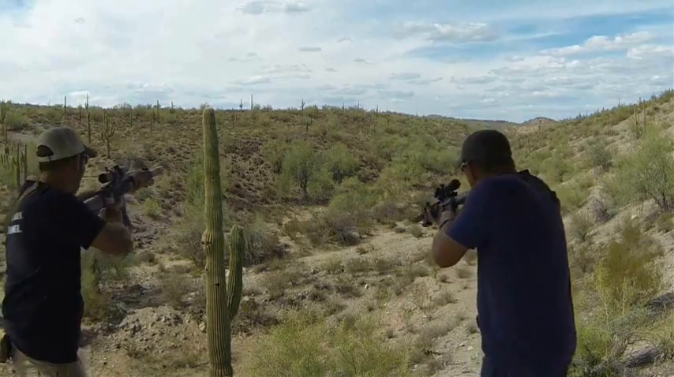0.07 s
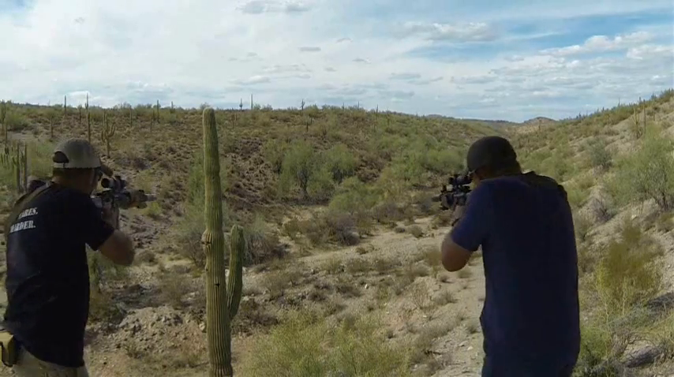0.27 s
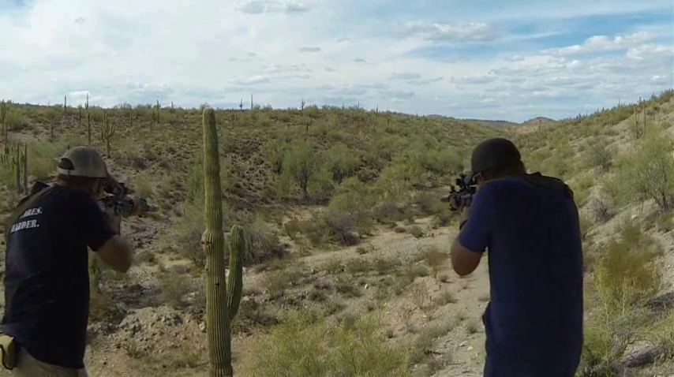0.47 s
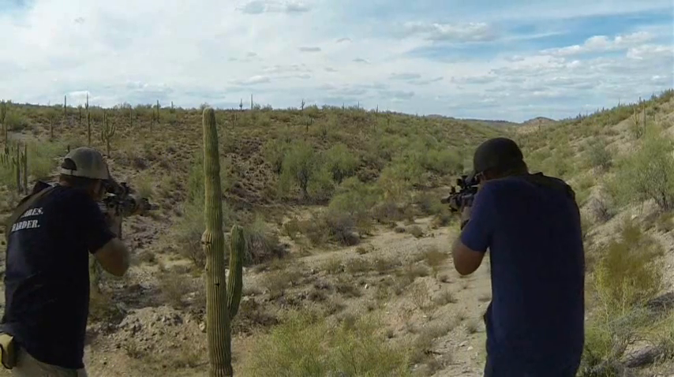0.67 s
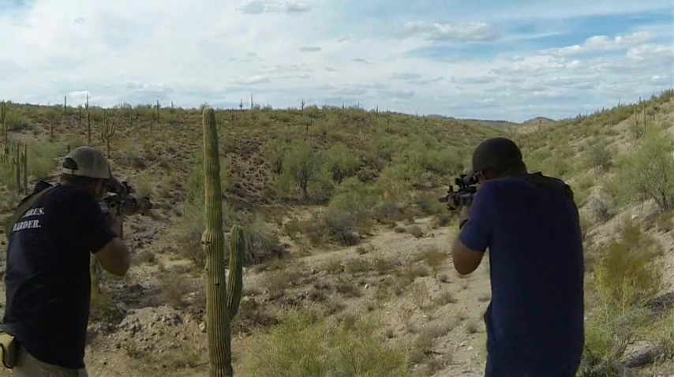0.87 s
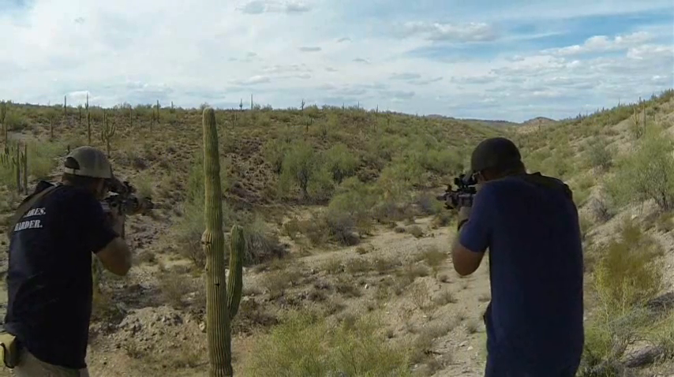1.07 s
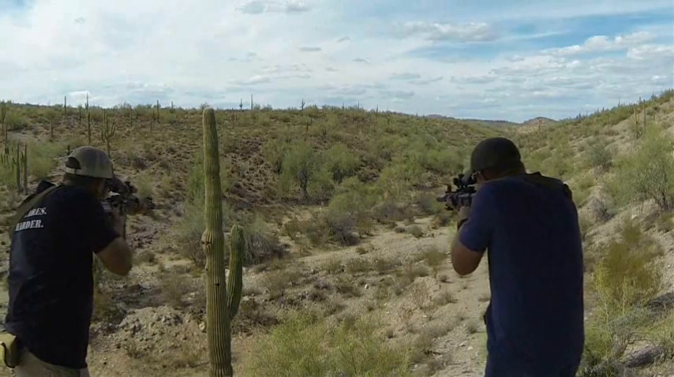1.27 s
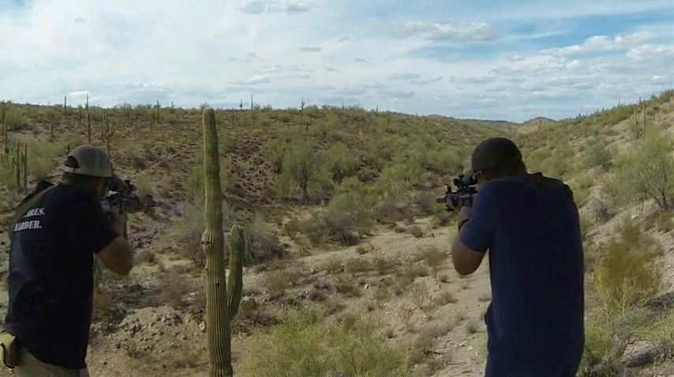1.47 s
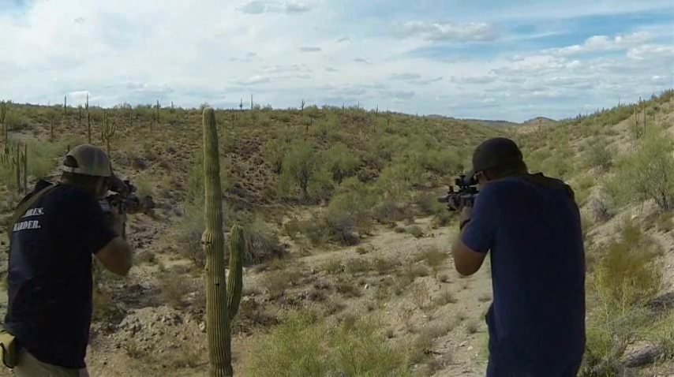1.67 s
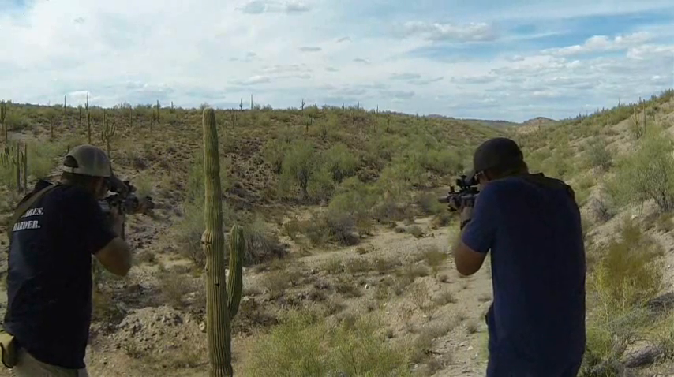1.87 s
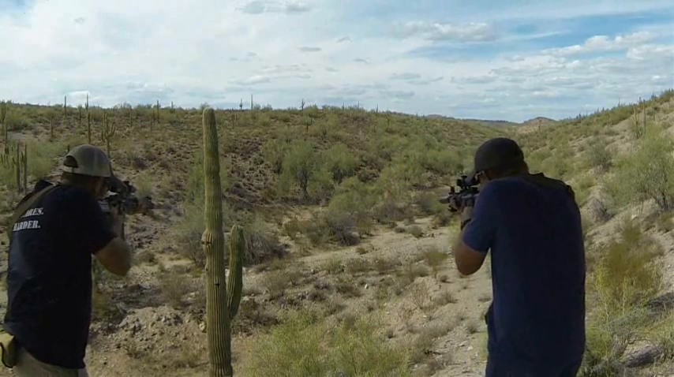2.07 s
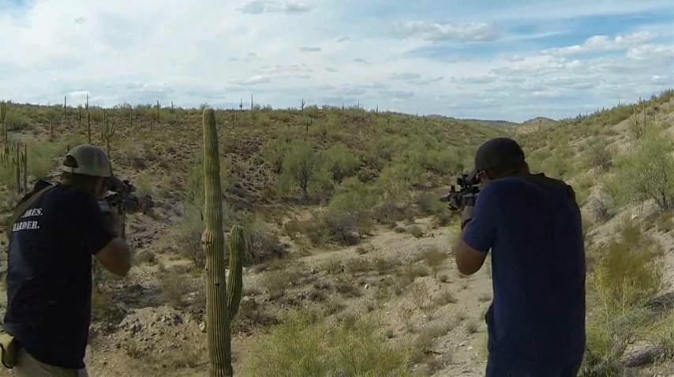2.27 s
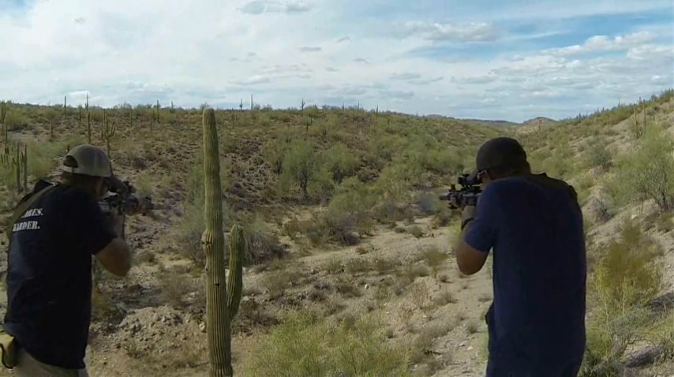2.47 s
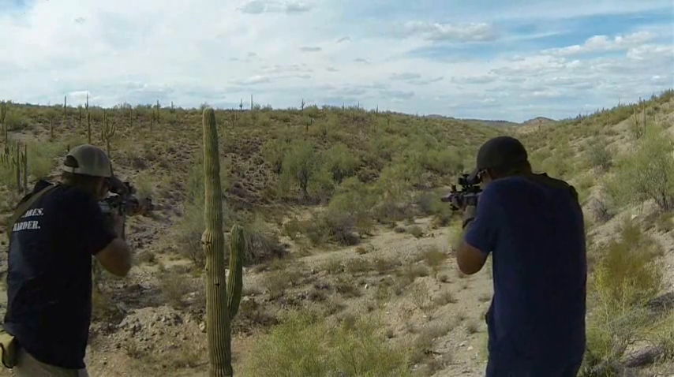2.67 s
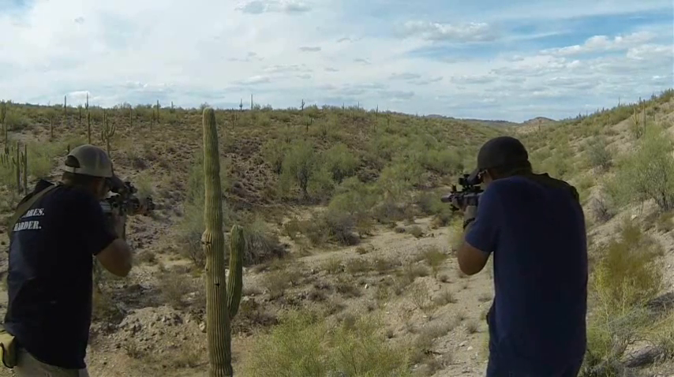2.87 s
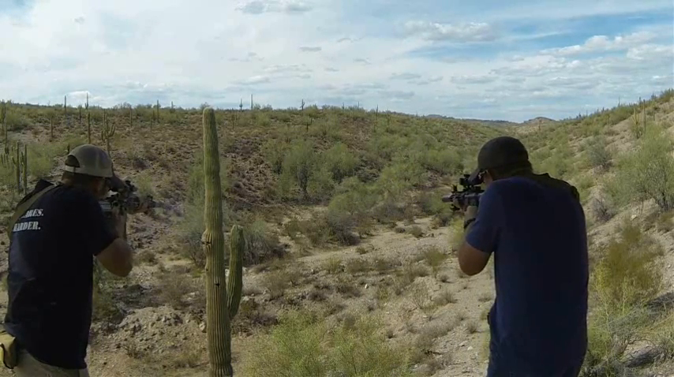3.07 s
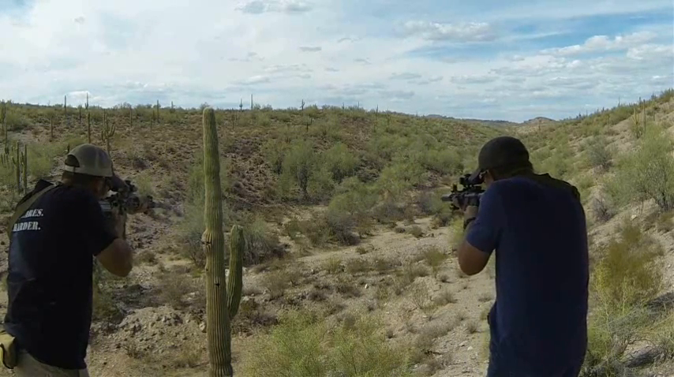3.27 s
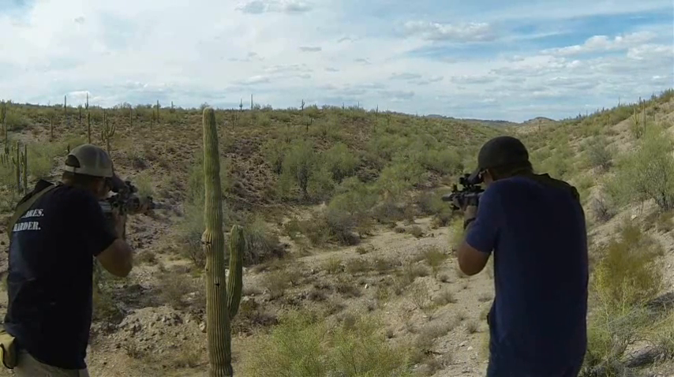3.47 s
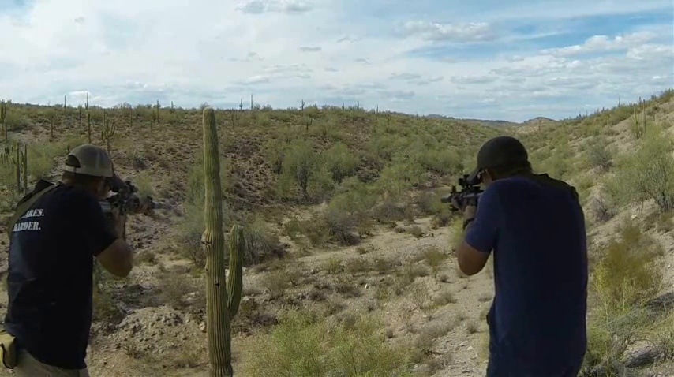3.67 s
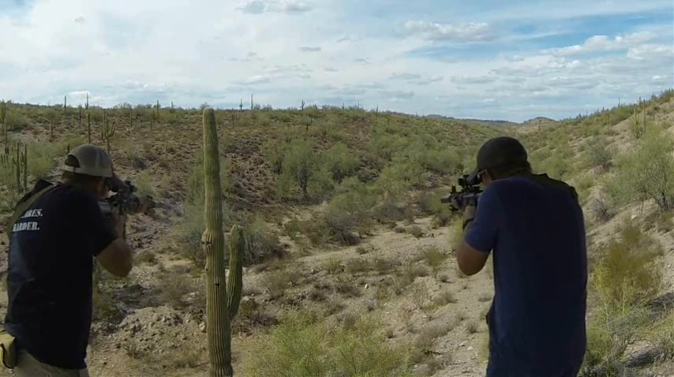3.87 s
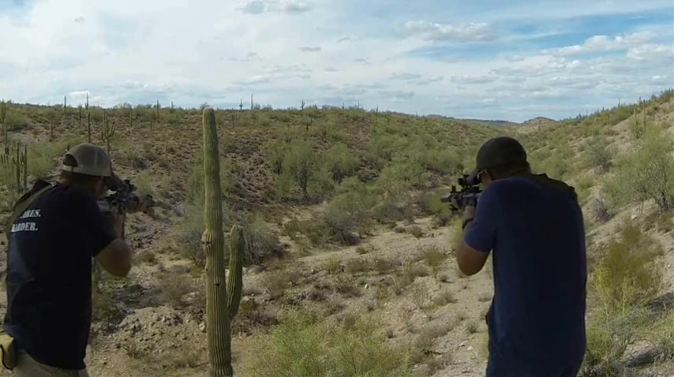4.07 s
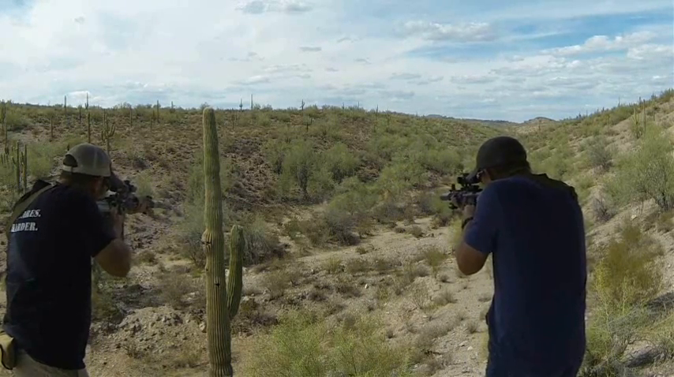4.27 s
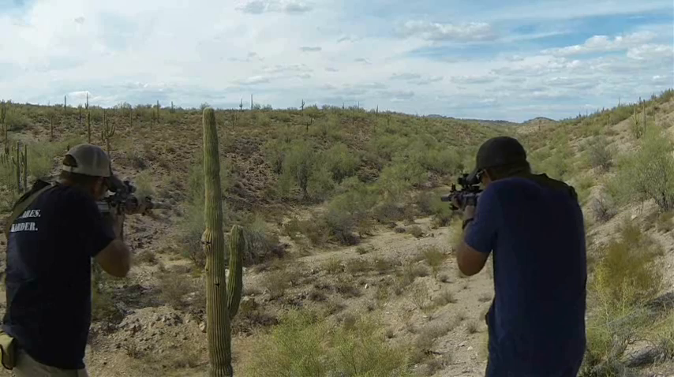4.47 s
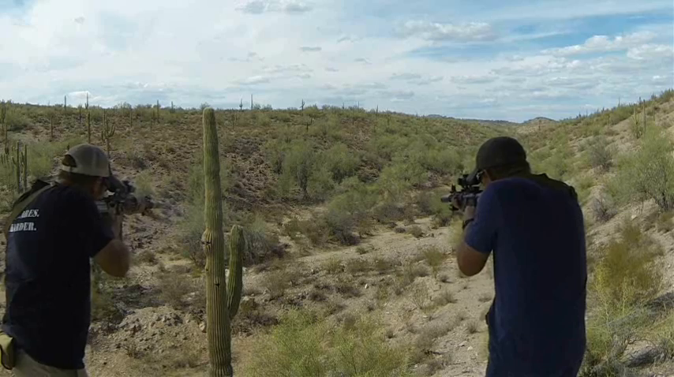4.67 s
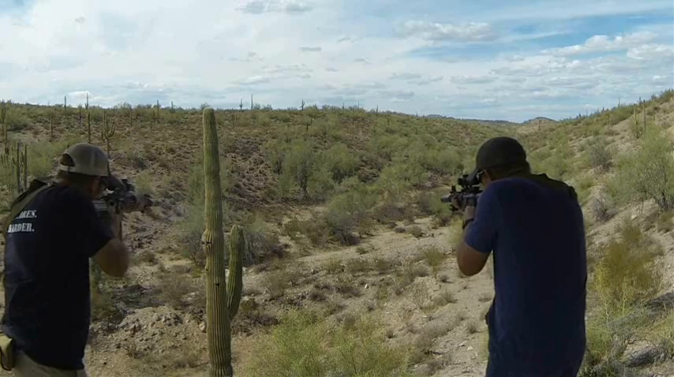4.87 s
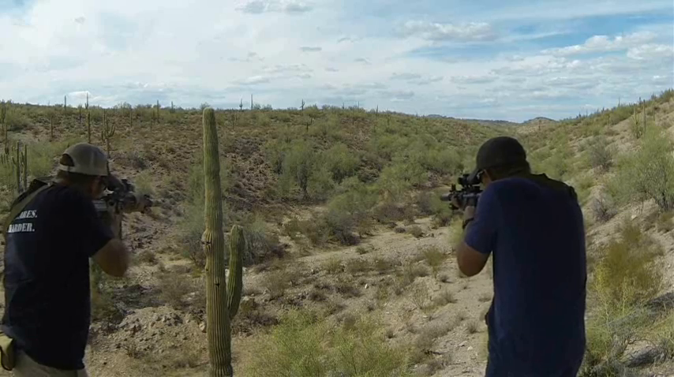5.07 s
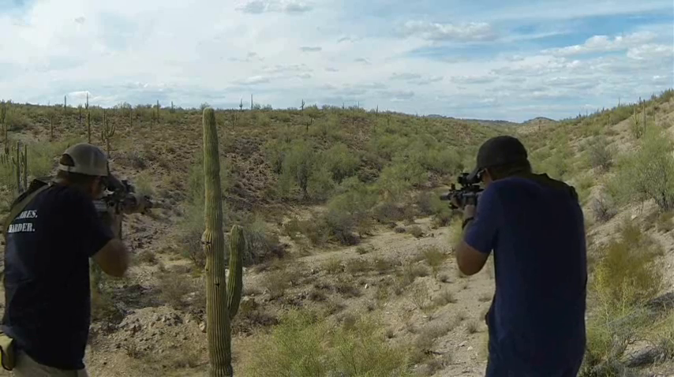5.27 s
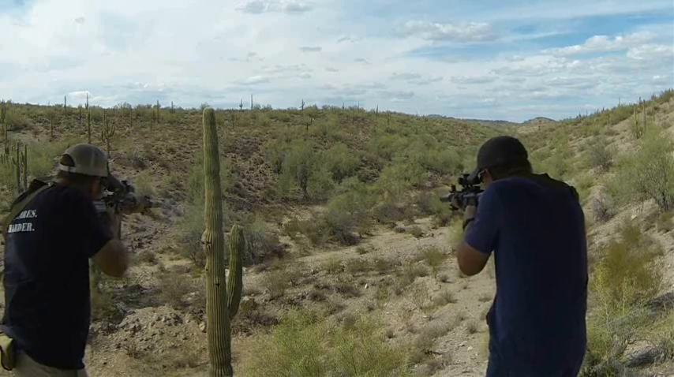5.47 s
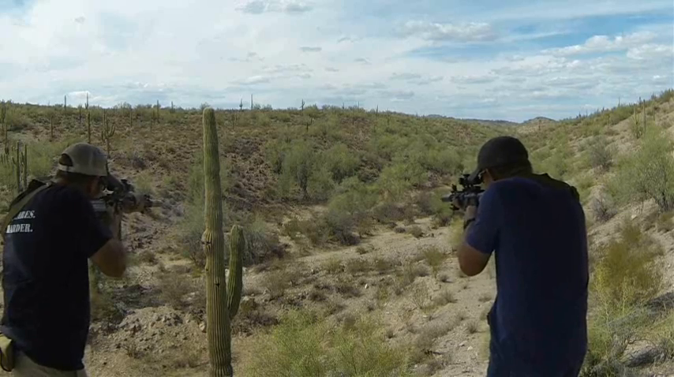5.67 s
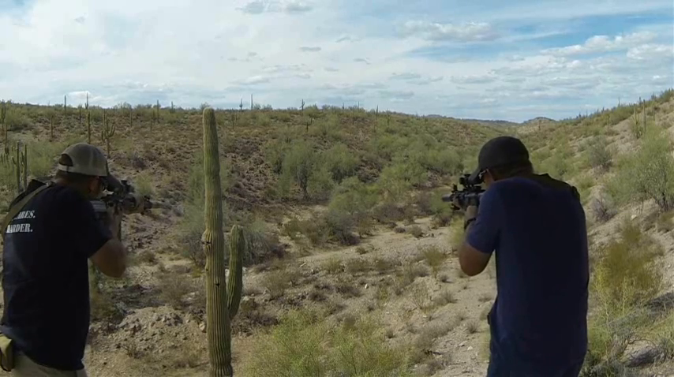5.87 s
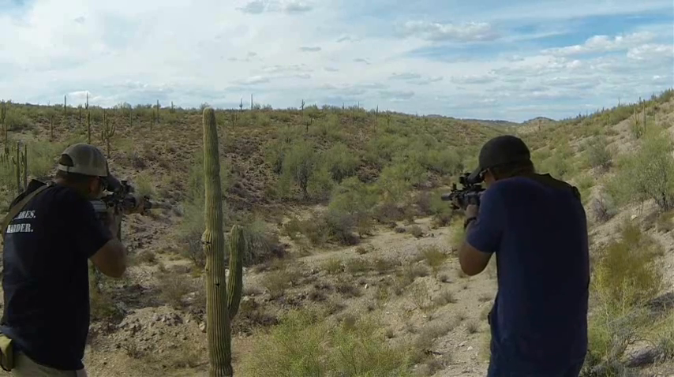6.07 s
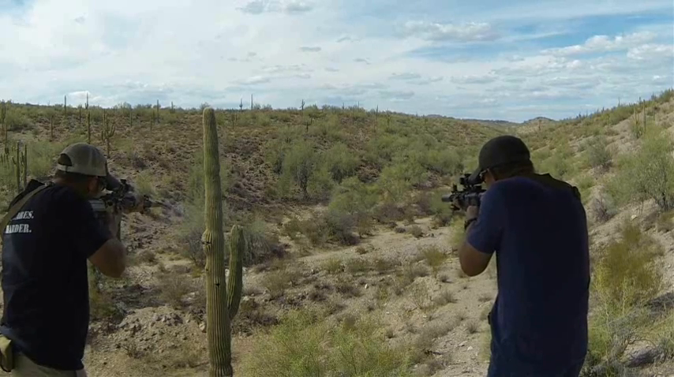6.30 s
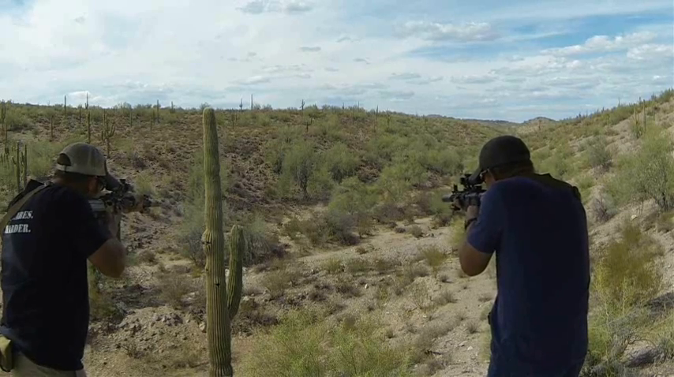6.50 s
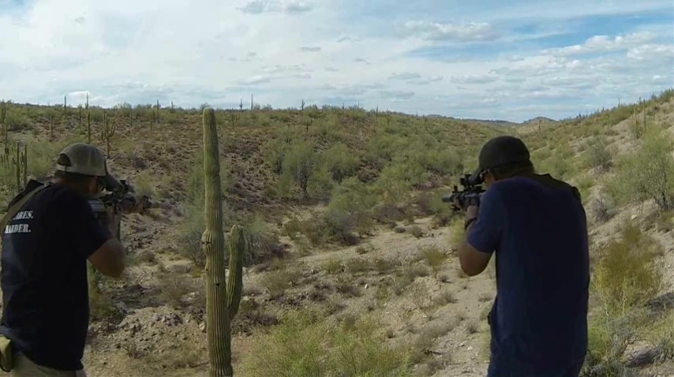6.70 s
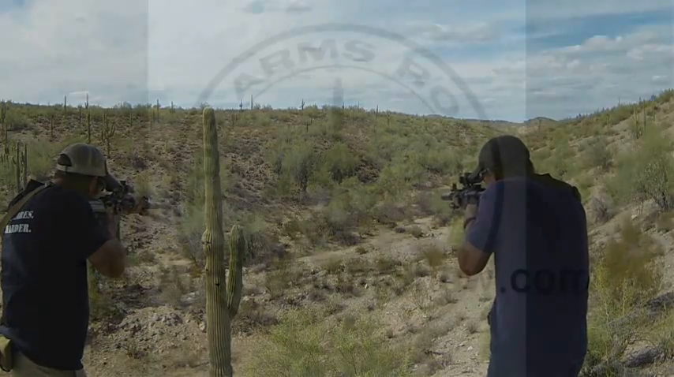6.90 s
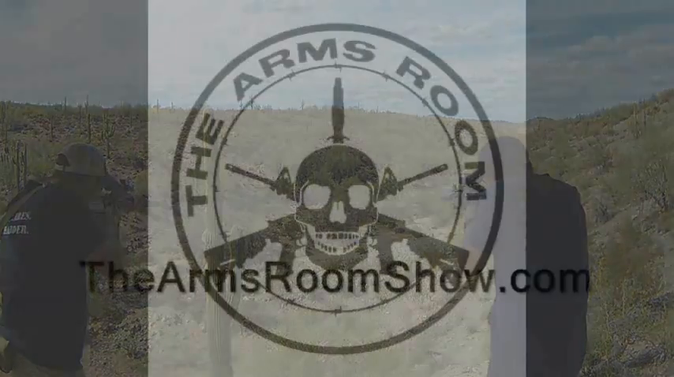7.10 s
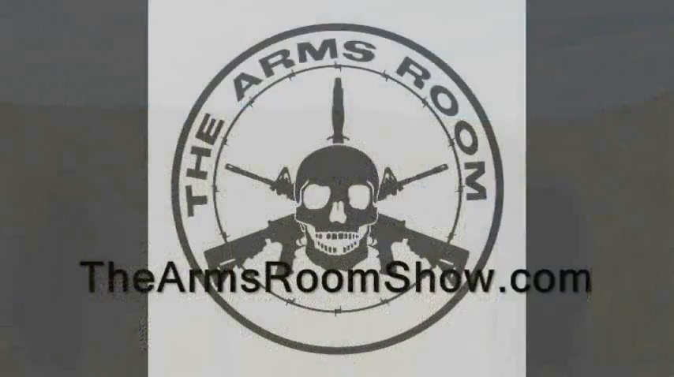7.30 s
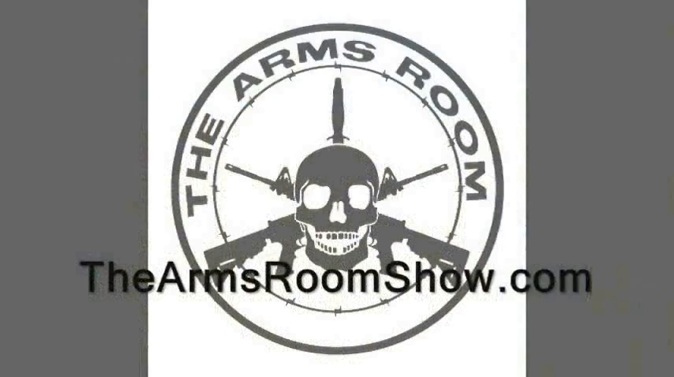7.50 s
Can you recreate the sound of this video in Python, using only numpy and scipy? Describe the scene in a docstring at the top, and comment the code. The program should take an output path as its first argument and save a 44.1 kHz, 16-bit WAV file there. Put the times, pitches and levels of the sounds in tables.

```python
"""A left rifle fires bright blasts across a desert valley, loud enough to overload the microphone.
Each is a short pressure wave with roaring gas, ground scatter, a ringing mount and a wash from the hills.
A right rifle gives duller pops: a rounder wave, near reflections, hissing gas and a tail from a nearby bank.
Noise bursts of steel and cloth and clicking catches open the scene as a round is chambered.
Behind it all, low noise in gusts is the wind on the microphone and faint hiss is the valley air."""
import sys
import numpy as np
from scipy import signal
from scipy.fft import rfft, irfft, next_fast_len
from scipy.io import wavfile

SR = 44100
rng = np.random.default_rng(int(sys.argv[2]) if len(sys.argv) > 2 else 0)


def store_pcm(level_fs):
    """Save levels as 16-bit WAV."""
    pcm = np.round(np.clip(level_fs, -1, 1) * 32767).astype(np.int16)
    wavfile.write(sys.argv[1], SR, np.atleast_2d(pcm).T)


N = 332514
T = np.arange(N) / SR
SHOT_T = T[:int(0.6 * SR)]  # span of one shot or knock
ECHO_T = T[:int(1.1 * SR)]  # span of one wash from the hills


def from_db(db):
    """Level in dB to linear gain."""
    return 10 ** (np.asarray(db) / 20)


def curve(rows, t):
    """Gain along a curve of (t/s, level/dB)."""
    return from_db(np.interp(t, *np.transpose(rows)))


def decay(t60):
    """Exponential dying away, 60 dB down after t60 seconds."""
    return 1e-3 ** (SHOT_T / t60)


def add(out, s, sound):
    """Mix a sound in at a time in seconds."""
    i = max(round(s * SR), 0)
    out[i:i + len(sound)] += sound[:len(out) - i]


def noise(spectrum, size=len(SHOT_T)):
    """Random noise filtered to a colour of (f/Hz, level/dB), then scaled to rms 1."""
    hz, db = np.transpose(spectrum)
    n = next_fast_len(size)
    f = np.maximum(np.fft.rfftfreq(n, 1 / SR), 1)
    gain = from_db(np.interp(np.log(f), np.log(hz), db))
    x = irfft(rfft(rng.standard_normal(n)) * gain, n)[:size]
    return x / x.std()


def lumps(t, per_s, depth_db):
    """A gain that wanders at random, as reflectors of unequal size answer in turn."""
    knots = rng.standard_normal(2048)
    return from_db(depth_db * np.interp(t * per_s, np.arange(len(knots)), knots))


def ring(modes, spread_db):
    """Struck modes: decaying sines, each with a new strength at every blow."""
    out = np.zeros(len(SHOT_T))
    for hz, db, t60 in modes:
        strength = from_db(db + spread_db * rng.standard_normal())
        out += strength * np.sin(2 * np.pi * hz * SHOT_T) * decay(t60)
    return out


def blast(paths, pulse_ms, steepness, jitter_ms):
    """An N-like pressure wave: one sine cycle steepened by its octave, arriving over several paths."""
    out = np.zeros(len(SHOT_T))
    phase = np.minimum(SHOT_T[:256] * 1000 / pulse_ms, 1)
    wave = -np.sin(2 * np.pi * phase) - steepness * np.sin(4 * np.pi * phase)
    for k, (ms, db) in enumerate(paths):
        # only the reflections jitter, the direct path stays put
        jitter = (k > 0) * jitter_ms * rng.standard_normal()
        add(out, (ms + jitter) / 1000, from_db(db) * wave)
    return out


def air_loss(x, loss_db):
    """The later an echo, the longer its path and the duller it is; loss in dB per second at 10 kHz."""
    f, t, z = signal.stft(x, SR, nperseg=256)
    loss = from_db(-loss_db * np.outer(f / 1e4, t))
    return signal.istft(z * loss, SR)[1][:len(x)]


def ground(colour, terrain, same, t60, rise_s, loss_db):
    """Scatter off stones and scrub: partly the same pattern on every shot, partly new."""
    same = np.clip(same, 0, 1)  # share of the power
    scatter = np.sqrt(same) * terrain + np.sqrt(1 - same) * noise(colour)
    rise = 1 - np.exp(-(SHOT_T / rise_s) ** 2)
    return air_loss(scatter, loss_db) * decay(t60) * rise


# left shots, levels relative to each layer: (t/s, blast level/dB, ground level/dB, hill echo level/dB)
LEFT_SHOTS = [(1.2186,3,3.5,4.5), (1.5054,3.5,-0.5,2.5), (1.9313,3,-1.5,0.5), (2.1301,1,.5,-2.5),
              (2.311,4.5,-0.5,0.5), (2.612,3,0.5,2.5), (3.189,3.5,-2,0), (3.3885,-.5,0.2,3),
              (4.035,3,-1.5,1), (4.3362,2,1.2,2), (4.8494,4,0,0.5), (5.2497,1.5,0,1),
              (5.6524,3.5,-0.7,-0.5), (6.1237,0,0.4,1.5), (6.404,3.5,-.5,0), (6.983,3.7,0.6,-1),
              (7.1651,2,-2,-3.5)]
# left muzzle's paths by way of ground, bodies and rocks: (delay t/ms, level/dB)
LEFT_PATHS = [(0, -9), (1.45, -12), (2.55, -10), (3.65, -7), (4.2, -9.5), (5.4, -35)]
# colour of muzzle gas, for both rifles: (f/Hz, relative level/dB)
GAS = [(100, 2), (280, -8), (500, -2.5), (900, -0.5), (1900, 1.5), (2600, -2.5), (4200, -7), (7000, -6),
       (10000, -7), (12000, -17.5), (15500, -35)]
# colour of the left rifle's ground scatter: (f/Hz, relative level/dB)
LEFT_GROUND = [(40, 2.5), (250, -1), (500, 0.5), (1800, 1), (4000, -2), (7000, 1), (10000, -5.5),
               (12500, -12), (15500, -23)]
# ring of the mount under a blast: (f/Hz, relative level/dB, t60/s)
MOUNT = [(123.7, -23.5, 0.086), (148.5, -26.5, 0.41), (163.2, -29.5, 0.34), (403, -25.5, 0.1),
         (497, -27, 0.14), (551, -31, 0.31), (675, -29, 0.29)]


def left_rifle():
    """Shock waves, a few milliseconds of roaring gas, a boom in the mount, then the landscape."""
    out, terrain = np.zeros(N), noise(LEFT_GROUND)
    gas_s, gas_rise_s, lead_s = 0.0089, 0.0018, 0.003
    boom_db, swell_db = -1, -18.5
    jet = np.exp(-(SHOT_T / gas_s) ** 4) * (1 - np.exp(-SHOT_T / gas_rise_s))
    # a weak rush swells just ahead of the main blast
    lead = (SHOT_T / lead_s) ** 2 * (SHOT_T < lead_s)
    # as the jet ends, the spent gas cloud swings below and above air pressure
    swell = -np.sin(2 * np.pi * 65 * SHOT_T) * decay(0.031)
    for s, blast_db, ground_db, echo_db in LEFT_SHOTS:
        shock = from_db(-3) * blast(LEFT_PATHS, pulse_ms=1.0, steepness=0.55, jitter_ms=0.06)
        gas = from_db(-11.5) * noise(GAS) * jet
        scatter = ground(LEFT_GROUND, terrain, same=0.25, t60=0.4, rise_s=0.0047, loss_db=24)
        boom = ring(MOUNT, spread_db=1.5) * lumps(SHOT_T, per_s=44, depth_db=2.5)
        add(out, s - lead_s, from_db(blast_db - 21) * noise(GAS) * lead)
        add(out, s, from_db(blast_db) * (shock + gas))
        add(out, s, from_db(ground_db - 17.0) * scatter)
        add(out, s, from_db(boom_db + ground_db) * boom)
        add(out, s + 0.0071, from_db(swell_db) * swell)
        add(out, s, from_db(echo_db) * hills())
    return out


# colour of the hill wash: (f/Hz, relative level/dB)
HILLS = [(40, -14), (100, -6.5), (150, 4.5), (210, -3.5), (300, -5.5), (500, -5), (900, -4), (1800, 2),
         (3500, 0.5), (6500, -4.5), (9500, -12), (12000, -18.5), (15500, -20)]


def hills():
    """Faint echoes off brush and slopes, so dense that they merge into lumpy noise."""
    wash = air_loss(noise(HILLS, size=len(ECHO_T)), loss_db=24)
    return wash * hill_envelope() * lumps(ECHO_T, per_s=680, depth_db=1.5)


# near brush, facing hill, far ridge and length of the valley:
# (delay t/s, relative level/dB, build-up t/s, t60/s)
SLOPES = [(0.111, -37, 0.04, 1.65), (0.182, -30.5, 0.04, 1.46), (.39, -37.5, .08, .6),
          (.62, -49.5, 0.069, 1.9)]


def hill_envelope():
    """Each slope's echo builds up to its delay, then dies away; their powers add."""
    power = 0
    for delay_s, db, build_s, t60 in SLOPES:
        late = ECHO_T - delay_s
        build = np.exp(-(np.minimum(late, 0) / build_s) ** 2)
        die = 1e-3 ** (np.maximum(late, 0) / t60)
        power = power + (from_db(db) * build * die) ** 2
    return np.sqrt(power)


# right shots, levels relative to each layer: (t/s, blast level/dB, ground level/dB, gas hiss level/dB)
RIGHT_SHOTS = [(1.7463, 0, -1.5, -28.5), (2.6946, -8, -3, -37), (3.0042, -0.5, -1.5, -27.5),
               (4.4183, -7.5, -2, -45), (4.724, 0, 0, -43), (5.2326, 4.5, 1.5, -31), (5.638, 0, -12, -21.5),
               (6.0375, 3, 1, -39), (6.793, -21, -6.5, -58), (7.3701, -8, -7, -30)]
# right muzzle's paths by way of ground, bodies and rocks: (delay t/ms, level/dB)
RIGHT_PATHS = [(0, 0.5), (1.6, -14), (4.4, -12), (5.9, -10.5), (7.6, -12), (10.8, -22), (14.8, -13.5),
               (17.3, -25)]
# colour of the right rifle's ground scatter: (f/Hz, relative level/dB)
RIGHT_GROUND = [(60, -11), (170, -13), (270, -3), (500, -2.5), (800, -0.5), (1000, -6), (1300, -3),
                (1850, -3), (2400, -16), (6000, -18.5), (10000, -28.5), (15500, -42)]
# colour of the tail from the nearby bank: (f/Hz, relative level/dB)
BANK = [(150, -30), (400, -11), (800, 1), (1300, -1.5), (1800, -10), (2500, -28), (9000, -55)]


def right_rifle():
    """A single rounded pop with distinct near reflections, a short hiss of gas and a dull tail."""
    out, terrain = np.zeros(N), noise(RIGHT_GROUND)
    tail_db, tail_t60_s = -27.5, 0.41
    for s, blast_db, ground_db, gas_db in RIGHT_SHOTS:
        pop = blast(RIGHT_PATHS, pulse_ms=0.83, steepness=0.14, jitter_ms=0.012)
        scatter = ground(RIGHT_GROUND, terrain, same=0.94, t60=0.24, rise_s=0.00082, loss_db=35)
        tail = noise(BANK) * decay(tail_t60_s) * (1 - np.exp(-SHOT_T / 0.016))
        add(out, s, from_db(blast_db - 1.0) * pop)
        add(out, s, from_db(ground_db - 19.5) * scatter * lumps(SHOT_T, per_s=250, depth_db=1.5))
        add(out, s, from_db(gas_db) * noise(GAS) * decay(0.073))
        add(out, s, from_db(ground_db + tail_db) * tail)
    return out


# the bolt slams home, then the rifle is brought up: (t/s, level/dB, t60/s, bright share of power 0-1)
HANDLING = [(0.109, -35, 0.27, 0.97), (.185, -47, 0.13, 1), (.238, -50, 0.17, .3),
            (0.301, -38.5, 0.5, 0.02), (0.354, -42.5, 0.27, 0.01), (.64, -61, .2, 0.8)]
# clicks of the catches: (t/s, ring level/dB, snap level/dB, ring t60/s)
CATCHES = [(0.057, -48, -46, 0.12), (.435, -49, -42.5, 0.053), (.453, -43, -50, 0.065),
           (.533, -57, -60, 0.13), (.591, -41.5, -52, .055)]
# colour of the receiver's ring: (f/Hz, relative level/dB)
RECEIVER = [(500, -32), (1250, -27), (1500, -4), (1700, 9), (2000, -5), (2300, -22), (2900, -12),
            (3800, -21), (9000, -38)]
# colour of a catch's snap: (f/Hz, relative level/dB)
SNAP = [(500, -18), (1600, -7), (3000, 8), (3900, -10), (5600, -8), (7000, -19), (12000, -30)]


def handling():
    """Steel slides and slaps, cloth brushes the stock, catches click: all decaying coloured noise."""
    out = np.zeros(N)
    # colours: (f/Hz, relative level/dB)
    steel_colour = [(100, -12), (700, -1), (1700, 5.0), (3500, 2.5), (7500, 2), (10500, -3), (15500, -21)]
    cloth_colour = [(100, 6.0), (400, -0.5), (1300, -9.0), (3000, -17.0), (12000, -40)]
    for s, db, t60, bright in HANDLING:
        bright = np.clip(bright, 0, 1)
        steel = np.sqrt(bright) * noise(steel_colour)
        cloth = np.sqrt(1 - bright) * noise(cloth_colour)
        rattle = lumps(SHOT_T, per_s=300, depth_db=1.5)
        add(out, s, from_db(db) * (steel + cloth) * decay(t60) * rattle)
    for s, ring_db, snap_db, t60 in CATCHES:
        rattle = lumps(SHOT_T, per_s=700, depth_db=1)
        receiver = from_db(ring_db) * noise(RECEIVER) * decay(t60) * rattle
        snap = from_db(snap_db) * noise(SNAP) * decay(0.018)
        add(out, s, receiver + snap)
    return out


# strength of the breeze: (t/s, level/dB)
BREEZE = [(0, -47.5), (1.1, -42), (2.8, -44), (3.7, -55), (5.8, -59), (6.8, -45), (7.5, -46)]
# gusts that swell and die on top of it: (peak t/s, whole length t/s, level/dB)
GUSTS = [(0.158, 0.088, -37), (0.524, 0.27, -38), (0.955, 0.3, -35), (1.118, .2, -38), (1.625, .2, -33.5),
         (2.2, 0.44, -39), (2.842, 0.25, -34)]
# colour of wind on the microphone: (f/Hz, relative level/dB)
GUST = [(10, -3.5), (30, -2), (60, -2.5), (110, -15), (200, -28), (400, -41), (900, -104)]


def wind():
    """A breeze with a few gusts buffets the microphone: low noise under their summed power."""
    power = curve(BREEZE, T) ** 2
    for s, length_s, db in GUSTS:
        swell = np.cos(np.pi * np.clip((T - s) / length_s, -0.5, 0.5))
        power = power + (from_db(db) * swell) ** 2
    return np.sqrt(power) * noise(GUST, size=N)


# colour of the distant air: (f/Hz, relative level/dB)
AIR = [(100, -1), (250, -3.5), (400, -6.5), (1000, -13), (2500, -18), (5000, -23.5), (9000, -26.5),
       (15000, -35)]


def air():
    """The faint hiss of the valley, with an earlier echo dying away in it."""
    air_db, old_echo_db, old_echo_t60_s = -58, -48.5, 2.2
    old_echo = from_db(old_echo_db) * 1e-3 ** (T / old_echo_t60_s)
    return np.hypot(from_db(air_db), old_echo) * noise(AIR, size=N)


def scene():
    """Both rifles, the handling, the wind and the air, in mono."""
    return (left_rifle() + right_rifle() + handling() + wind() + air())[None]


# the level sinks briefly: (deepest t/s, fall t/s, level/dB)
DIPS = [(2.303, 0.026, -26.5), (4.029, 0.014, -8), (4.842, 0.024, -5)]


def record(dry):
    """The loudest peaks saturate, the level dips briefly, the end fades, the extreme treble is cut."""
    top, gain_db, cutoff_hz = 0.84, 0.13, 15700  # top: amplitude ceiling of the saturation
    dip_recovery_s, fade_start_s, fade_db_per_s = 0.0084, 7.112, 23
    loud = dry / (1 + (dry / top) ** 6) ** (1 / 6)
    dip_db = np.zeros(N)
    for s, fall_s, db in DIPS:
        dip_db += np.interp(T - s, [-fall_s, 0, dip_recovery_s], [0, db, 0])
    fade_db = -fade_db_per_s * np.maximum(T - fade_start_s, 0)
    cut = signal.ellip(10, 0.1, 70, cutoff_hz, fs=SR, output="sos")
    return signal.sosfilt(cut, loud * from_db(gain_db + dip_db + fade_db))


dry = scene()
out = record(dry)
store_pcm(out)
```